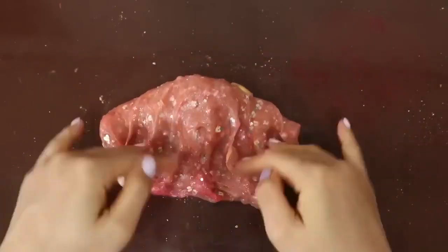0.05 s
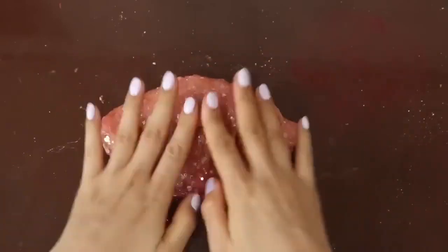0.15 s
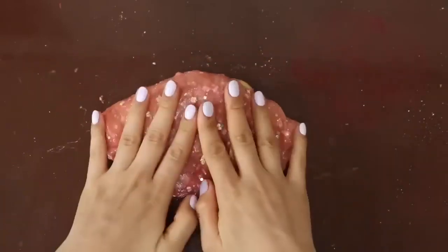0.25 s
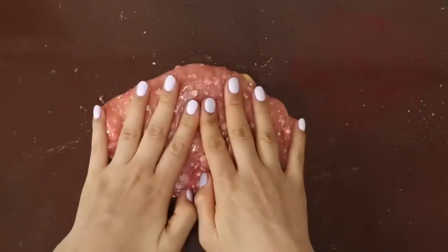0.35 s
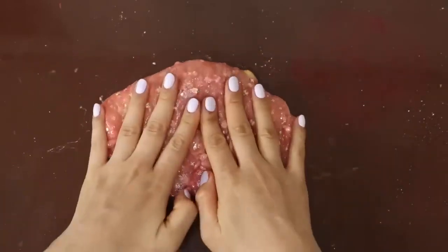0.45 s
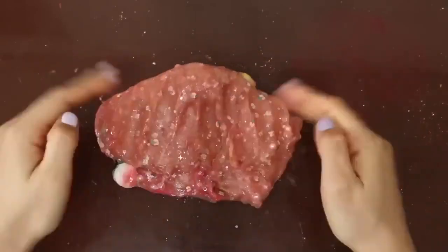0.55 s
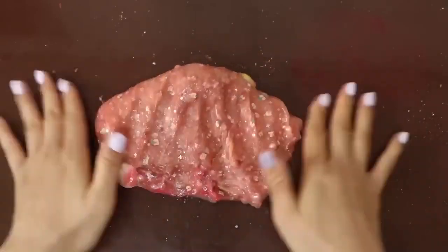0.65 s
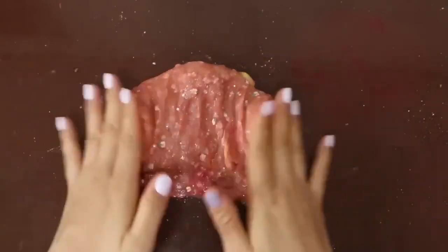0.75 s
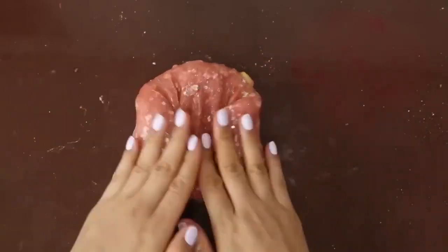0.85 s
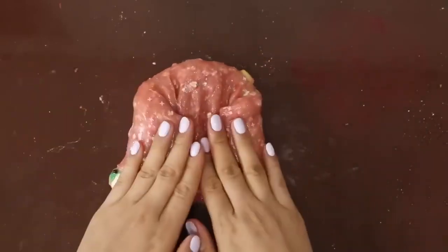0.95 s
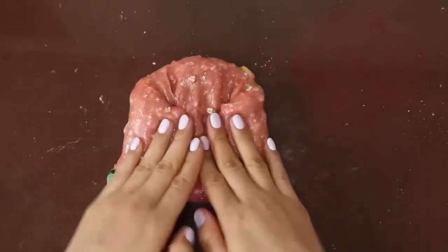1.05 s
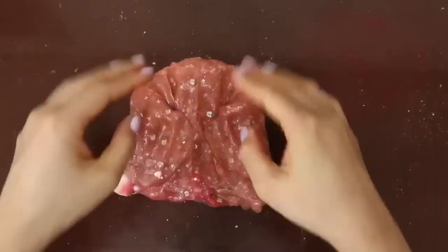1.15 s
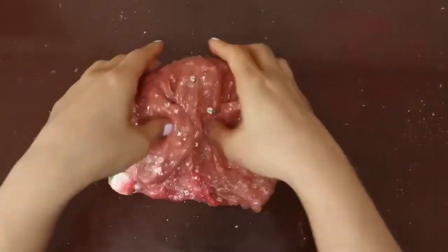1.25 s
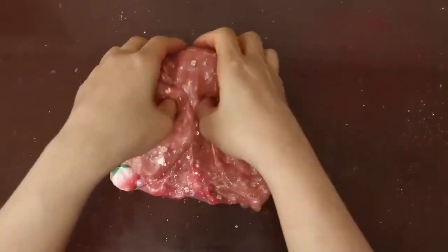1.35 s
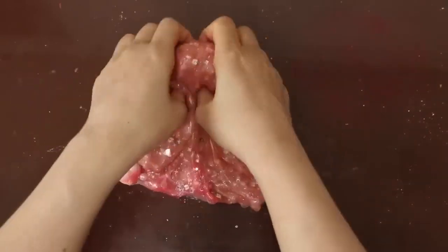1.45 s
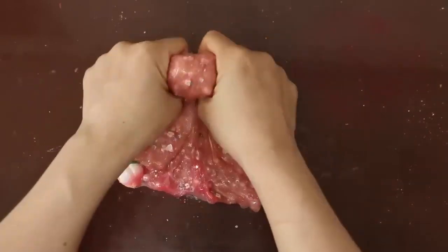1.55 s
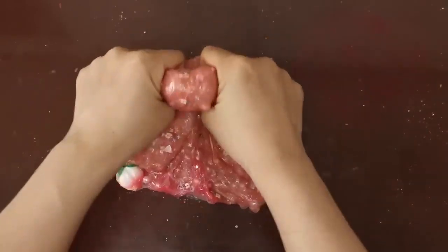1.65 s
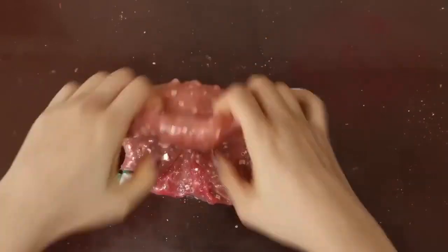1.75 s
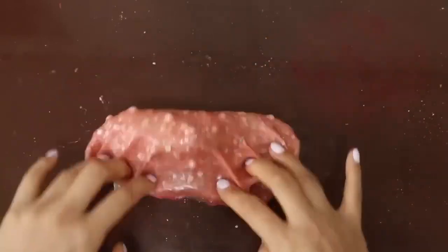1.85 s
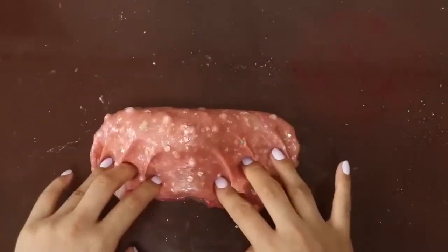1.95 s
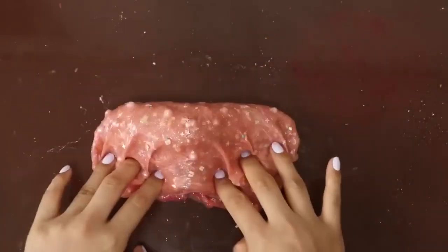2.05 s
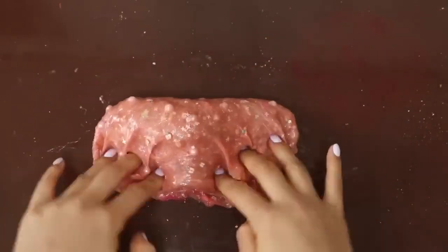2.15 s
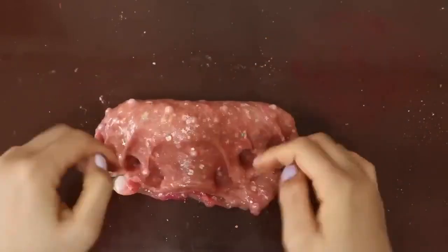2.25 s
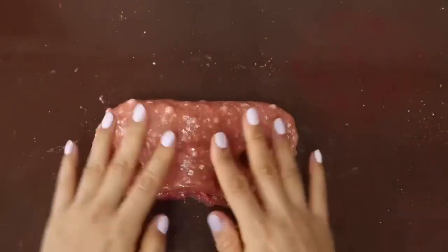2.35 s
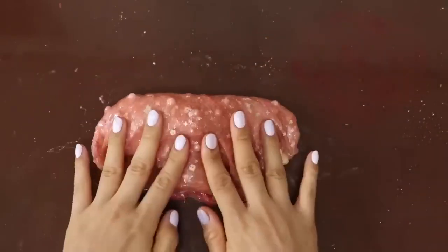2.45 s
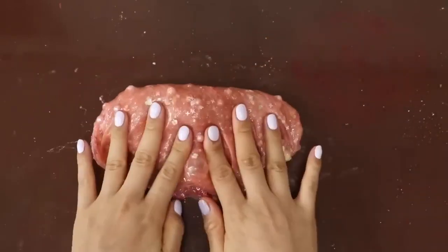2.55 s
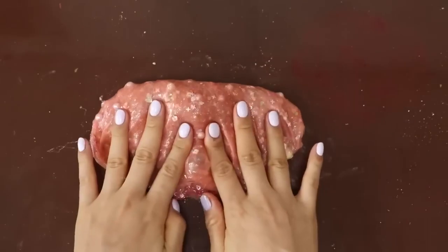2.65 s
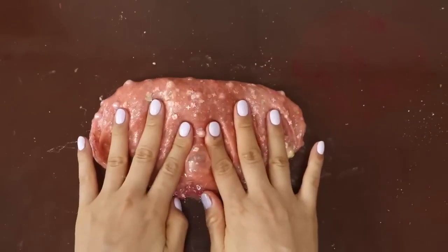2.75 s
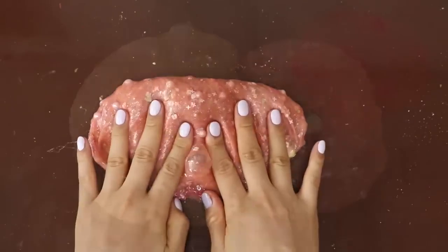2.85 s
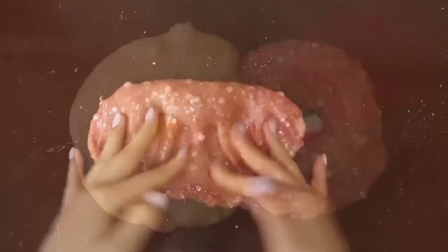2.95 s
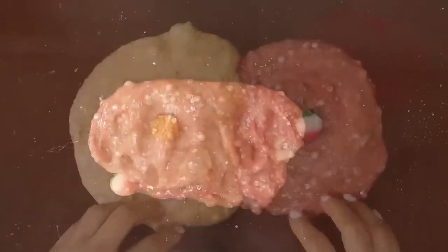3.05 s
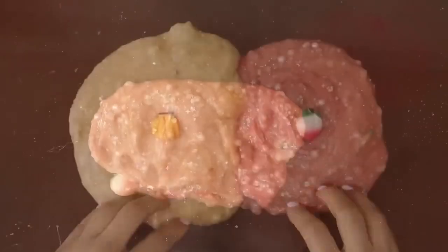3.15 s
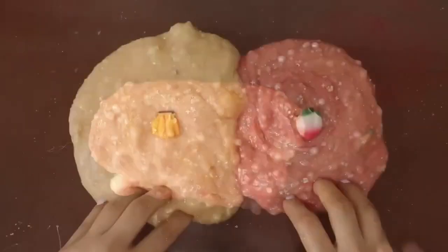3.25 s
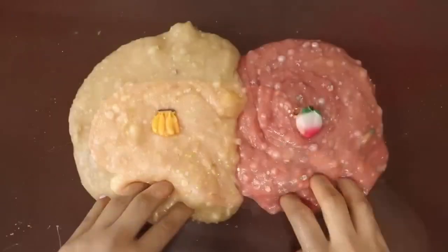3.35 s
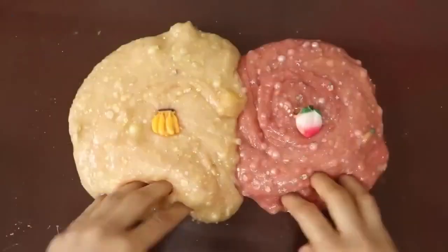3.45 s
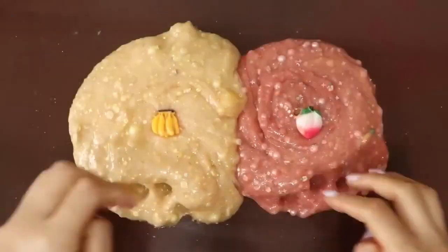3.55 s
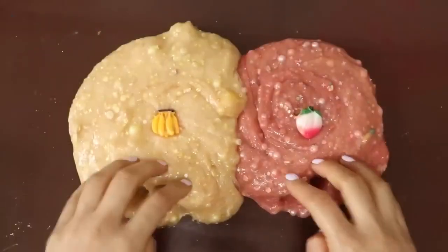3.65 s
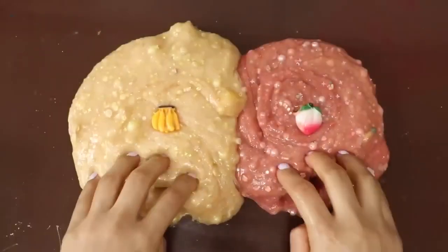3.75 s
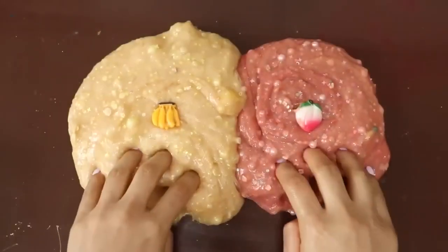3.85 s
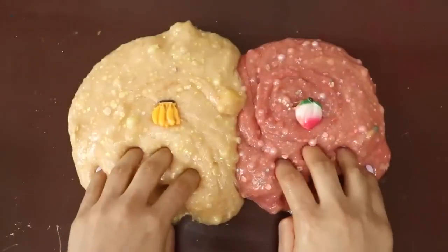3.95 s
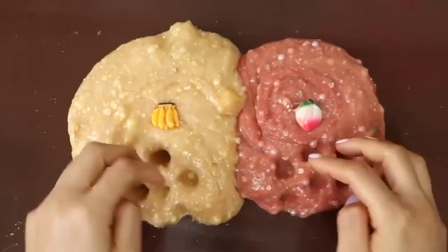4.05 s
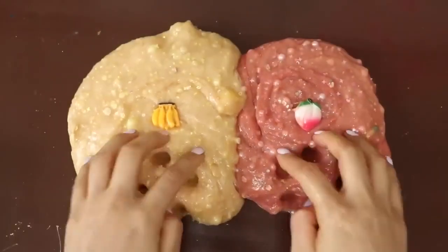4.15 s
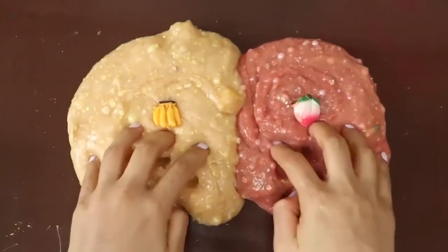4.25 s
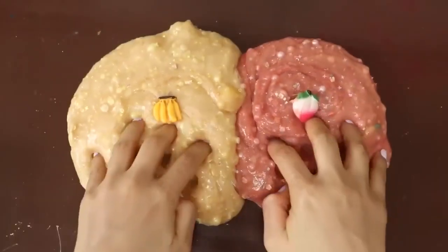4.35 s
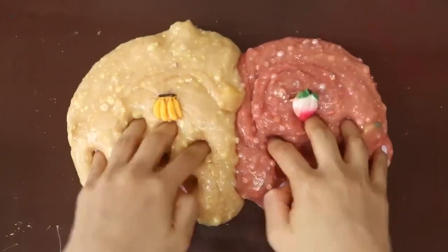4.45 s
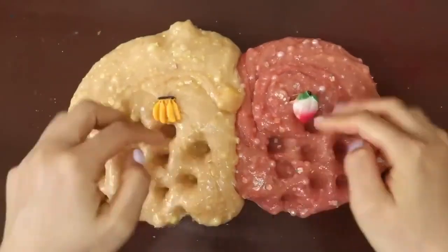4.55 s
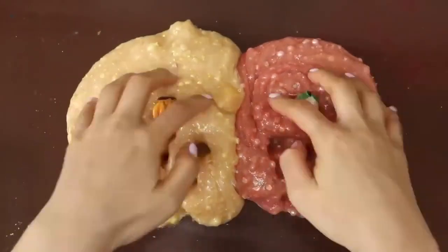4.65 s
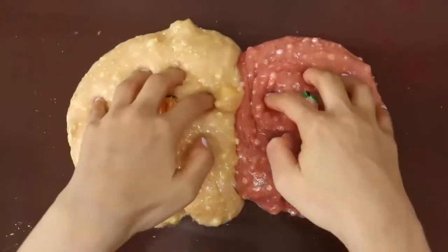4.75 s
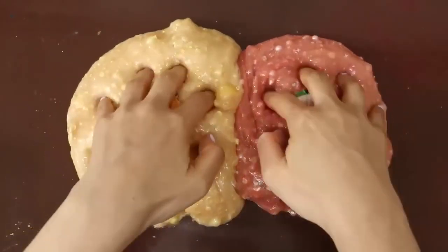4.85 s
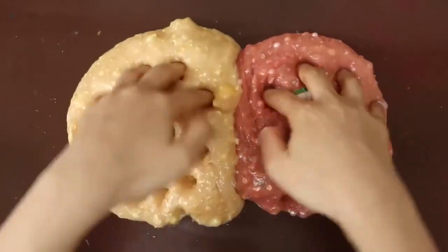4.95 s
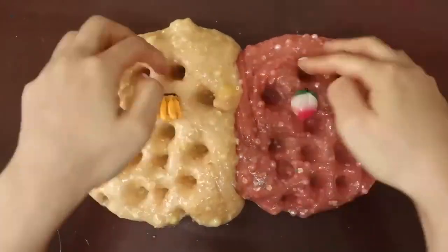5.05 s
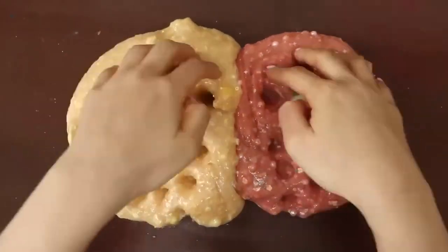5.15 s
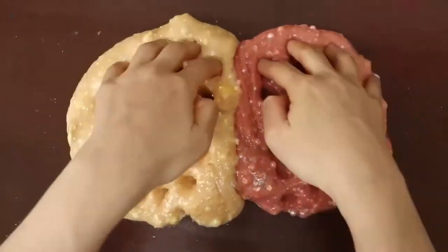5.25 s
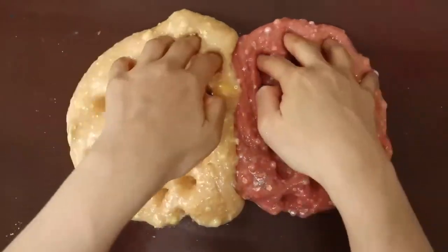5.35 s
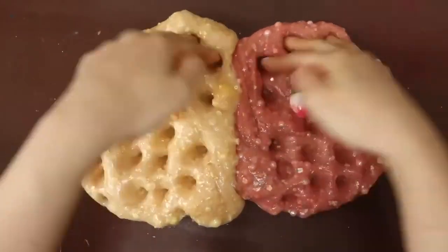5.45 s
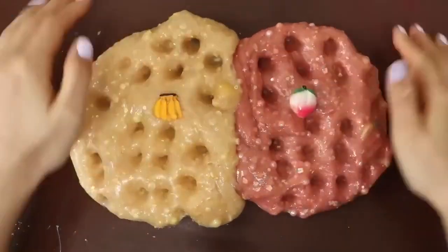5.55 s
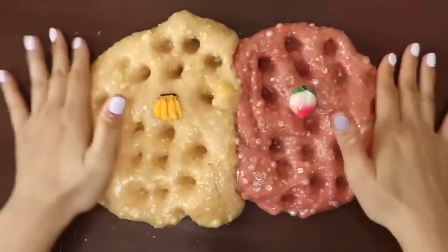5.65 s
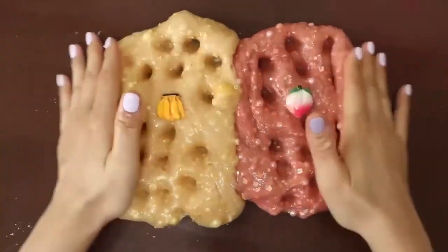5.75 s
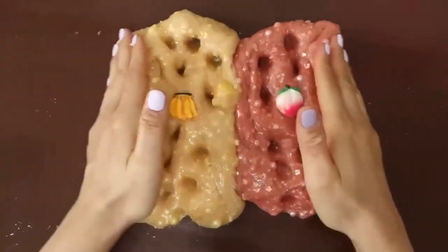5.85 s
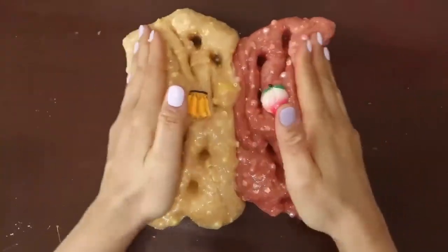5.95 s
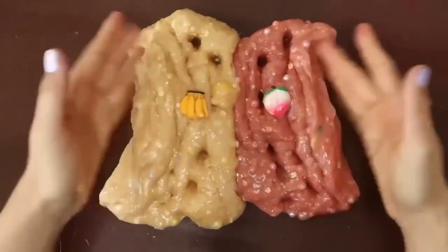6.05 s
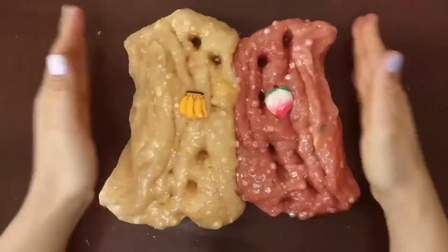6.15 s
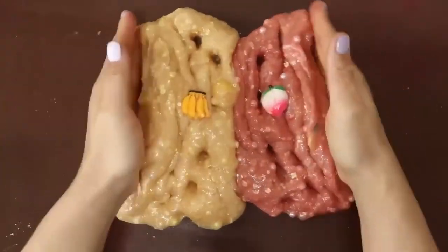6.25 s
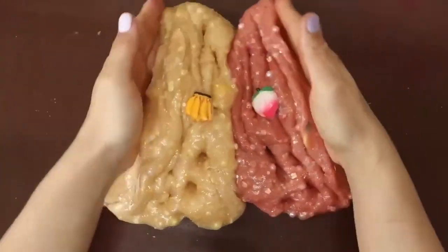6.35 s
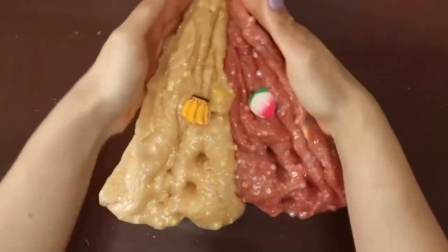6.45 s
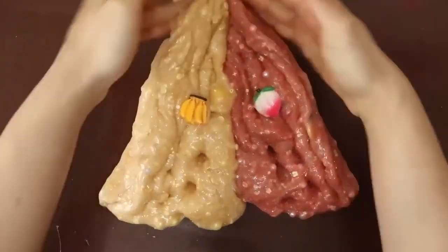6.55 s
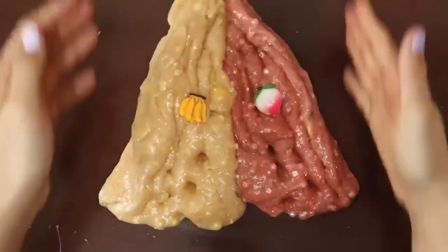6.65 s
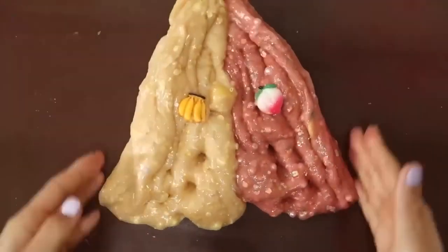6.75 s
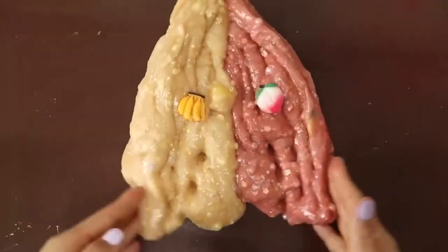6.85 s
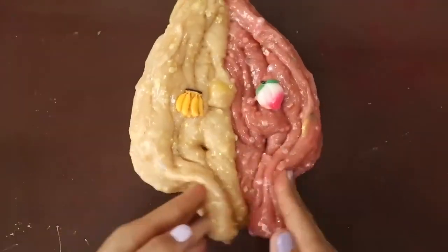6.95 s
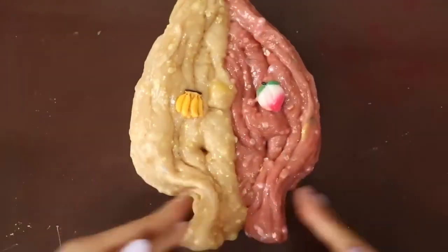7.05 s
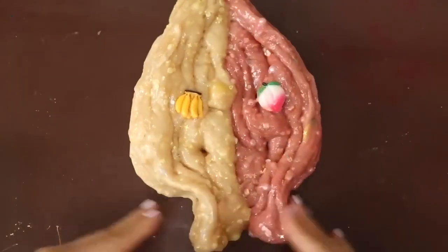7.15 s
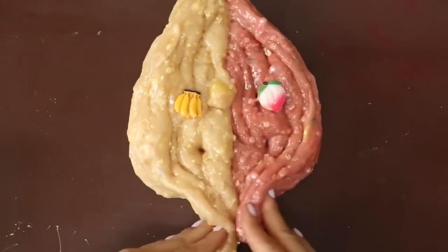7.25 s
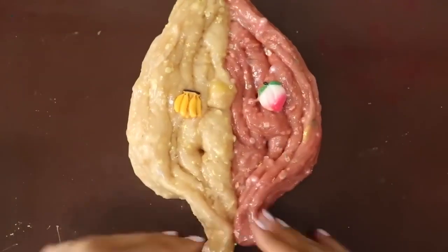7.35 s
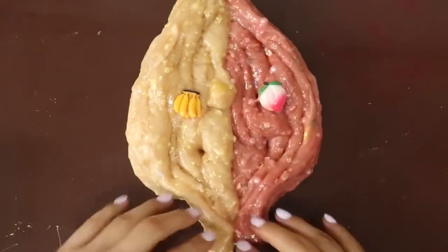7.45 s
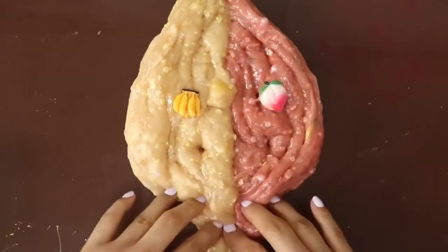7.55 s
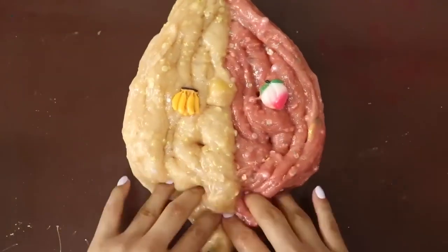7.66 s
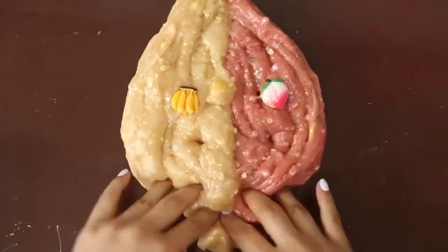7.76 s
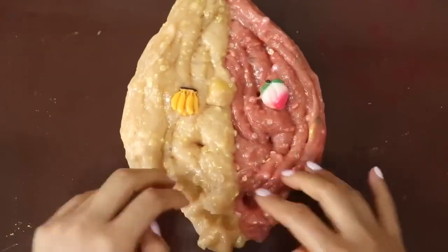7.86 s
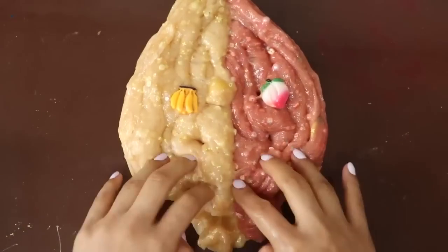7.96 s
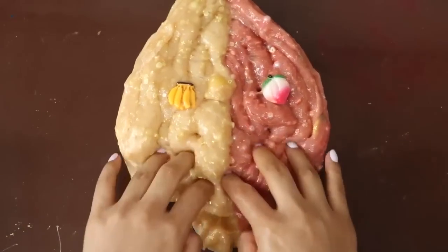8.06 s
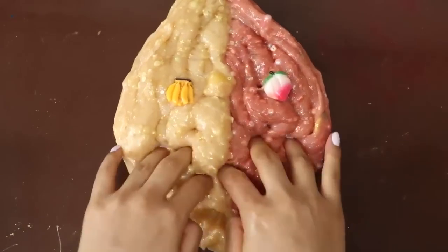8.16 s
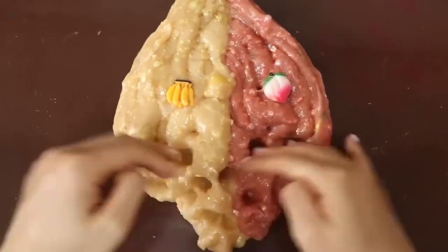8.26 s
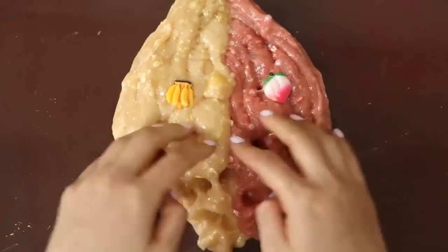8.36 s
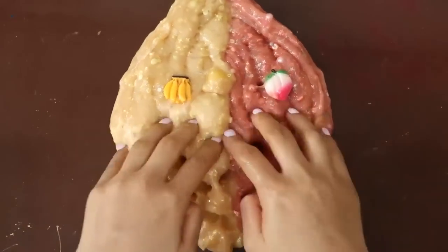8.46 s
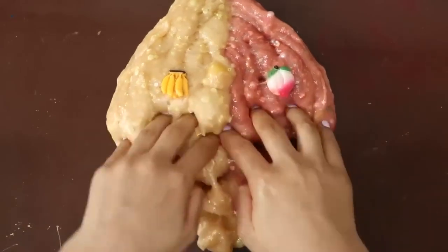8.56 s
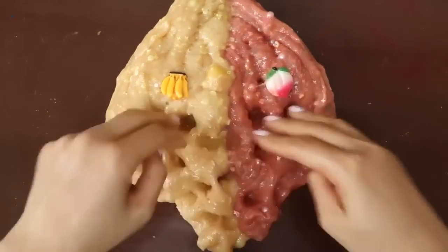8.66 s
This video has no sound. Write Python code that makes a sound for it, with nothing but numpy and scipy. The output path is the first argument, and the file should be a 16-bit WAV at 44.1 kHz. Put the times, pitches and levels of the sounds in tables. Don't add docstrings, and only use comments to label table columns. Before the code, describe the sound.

In a quiet, slightly reflective room, a very close microphone pair catches fingers squeezing tacky slime. Wet film tears in dense tiny crackles, trapped air bursts with crisp hollow pops, and thin strands tick apart. Soft at first, it grows loudest midway as fingers poke repeatedly, then thins to scattered ticks, one flat slap and gentle presses. Low thuds shake the table under faint hiss and hum.

```python
import sys
import numpy as np
from scipy import signal
from scipy.io import wavfile
from scipy.ndimage import uniform_filter1d

SR = 44100
rng = np.random.default_rng(int(sys.argv[2]) if len(sys.argv) > 2 else 0)


def master_out(mix):
    frames = np.transpose(np.atleast_2d(mix))
    ceiling = np.clip(frames, -1, 1)
    pcm = np.round(ceiling * 32767).astype(np.int16)
    wavfile.write(sys.argv[1], SR, pcm)


def magnitude_from_level(level_db):
    exponent = np.asarray(level_db, float) / 20
    return 10 ** exponent


N = 384552


def rms_one(x):
    return x / np.sqrt(np.mean(x ** 2) + 1e-20)


def at_hz(points, hz):
    points = np.array(points)
    return np.interp(np.log(hz), np.log(points[:, 0]), points[:, 1])


def drift(rate_hz):
    r = np.exp(-2 * np.pi * rate_hz * 40 / SR)
    white = rng.standard_normal(N // 40 + 2002)
    slow = signal.lfilter([1], [1, -2 * r, r * r], white)[2000:]
    return np.interp(np.arange(N) / 40, np.arange(len(slow)), rms_one(slow))


def resonate(x, hz, width_hz):
    r = np.exp(-np.pi * width_hz / SR)
    poles = [1, -2 * r * np.cos(2 * np.pi * hz / SR), r * r]
    return signal.lfilter(np.array([1, 0, -1]) * (1 - r * r) / 2, poles, x)


def spread(mid, side, alike):
    alike = np.clip(alike, -1, 1)
    return np.sqrt((1 + alike) / 2) * mid + np.sqrt((1 - alike) / 2) * side * [[1], [-1]]


# (pitch [Hz], level [dB per Hz])
ROOM_HISS = [(20, -8), (48, -3), (91, -11.5), (143, -9), (273, -30.5), (1110, -34), (4000, -48.5),
             (16500, -48)]
# (pitch [Hz], likeness [-1 to 1])
ROOM_LIKENESS = [(60, 0.32), (380, 0.92), (2380, 0.9), (15000, 0.18)]


def room_tone():
    hiss_db, hum_db, hum_hz = -53, -72.5, 346
    hiss, edges_hz = 0, 20 * 2 ** np.arange(0, 10.1, .5)
    white = rng.standard_normal((2, 2, N))
    for k, (low, high) in enumerate(zip(edges_hz, edges_hz[1:])):
        band = signal.butter(2, [low, high], "band", fs=SR, output="sos")
        mid, side = signal.sosfilt(band, white[k % 2])
        hz = np.sqrt(low * high)
        hiss = hiss + magnitude_from_level(at_hz(ROOM_HISS, hz)) * spread(mid, side, at_hz(ROOM_LIKENESS, hz))
    hum = resonate(white[0, 0], hum_hz, 3.3) + .5 * resonate(white[1, 0], 1.5 * hum_hz, 8.2)
    return magnitude_from_level(hiss_db) * rms_one(hiss) + magnitude_from_level(hum_db) * rms_one(hum)


def echoes(x):
    t60_s, wall_cut_hz = 0.18, 8700
    t = np.arange(9000) / SR
    tail = rng.standard_normal((2, len(t))) * magnitude_from_level(-60 * t / t60_s) * (t > .002)
    dull = np.exp(-2 * np.pi * wall_cut_hz / SR)
    tail = signal.lfilter([1 - dull], [1, -dull], tail)
    tail = tail / np.sqrt(np.sum(tail ** 2) / 2)
    return signal.fftconvolve(x, tail, axes=1)[:, :N]


# (time of the peak [s], level [dB])
SHOVES = [(0.188, -32.5), (0.315, -29), (0.618, -31), (0.779, -29.5), (0.921, -45), (1.33, -35.5),
          (1.841, -22), (2.341, -29.5), (2.521, -48), (3.072, -30), (3.582, -31.5), (4.149, -22.5),
          (4.266, -38.5), (4.652, -21), (4.781, -35), (5.129, -19.5), (5.589, -22), (5.747, -25),
          (6.22, -21.5), (6.698, -21), (7.207, -29.5), (7.362, -34), (7.476, -28.5), (7.936, -22),
          (8.031, -31.5), (8.34, -22)]


def stand():
    sway_hz, jolt_hz = 30.5, 62.4
    t, out = np.arange(22050) / SR, np.zeros((2, N + 22050))
    swell = t / 0.036 * np.exp(1 - t / .035)
    sway_level = (1 - np.exp(-t / 0.011)) * np.exp(-t / 0.096)
    for (s, db), (detune, turn, skew) in zip(SHOVES, rng.standard_normal((len(SHOVES), 3))):
        phase = 3 * turn + np.array([[0], [1.1 + .4 * skew]])
        sway = sway_level * np.sin(2 * np.pi * sway_hz * (1 + 0.07 * detune) * t + phase)
        jolt = 0.42 * swell ** 2 * np.sin(2 * np.pi * jolt_hz * (1 + 0.19 * skew) * t + phase)
        at = round((s - .04) * SR)
        out[:, at:at + len(t)] += magnitude_from_level(db - 1.0) * (sway + jolt) * magnitude_from_level([[1.5], [-1.5]])
    return out[:, :N]


# (time of the peak [s], rocking level [dB], boom level [dB], boom pitch [Hz])
KNOCKS = [(0.167, -42, -49, 147.6), (0.308, -31, -39.5, 70), (0.617, -38, -46.5, 285),
          (0.773, -37, -38, 181.5), (1.839, -46, -38.5, 115), (2.323, -35, -37.5, 129),
          (3.054, -32, -39.5, 263), (3.601, -34, -35, 199), (4.123, -24, -32.5, 198),
          (4.625, -28, -27.5, 192), (5.119, -27.5, -29.5, 241.7), (5.371, -48, -50.5, 264),
          (5.577, -30, -32.5, 238), (5.721, -33.5, -34, 189.5), (6.181, -37, -36.5, 140),
          (6.334, -42, -49, 129), (6.675, -42, -48.5, 248), (7.052, -41, -48, 132.7),
          (7.163, -44, -47.5, 145.3), (7.345, -38, -40, 195), (7.446, -46, -44, 222),
          (7.9, -29.5, -35.5, 254.2), (8.027, -45, -53.5, 197.7), (8.344, -24.5, -27.5, 187)]


def table():
    rock_hz = 124.6
    t, out = np.arange(22050) / SR, np.zeros((2, N + 22050))
    swell = (t / 0.02 * np.exp(1 - t / 0.023)) ** 1.9
    whites = rng.standard_normal((len(KNOCKS), 3, len(t)))
    for (s, rock_db, boom_db, boom_hz), white in zip(KNOCKS, whites):
        rock = resonate(swell * (np.sin(2 * np.pi * rock_hz * t) + 5 * white[0]), rock_hz, 34)
        boom = resonate(swell * np.sin(2 * np.pi * boom_hz * t), boom_hz, 72)
        rattle = resonate(resonate(swell * white[1:], 210, 140), 210, 140)
        knock = magnitude_from_level(boom_db + 2.0) * (0.66 * boom + 7.76 * rattle)
        knock = knock + magnitude_from_level(rock_db + 3.0) * rock * [[.85], [-1.15]]
        at = round((s - .035) * SR)
        out[:, at:at + len(t)] += knock
    rumble = resonate(resonate(rng.standard_normal((2, N)), 110, 170), 110, 170)
    restless = magnitude_from_level(3.2 * drift(6)) * rms_one(rumble)
    return out[:, :N] + magnitude_from_level(-57.0) * restless


# (time [s], level [dB])
SLIDE = [(0.0, -73), (1.38, -65.5), (1.7, -52), (2.01, -68.5), (3.6, -76), (3.82, -60), (4.1, -67),
         (6.63, -62), (7.48, -67), (7.72, -56.5), (7.95, -64), (8.72, -71)]


def sliding():
    rustle_hz, rustle_width_hz, rustle_db = 2800, 1500, -5
    stray_per_s, stray_db = 35, 10
    rustle = rms_one(resonate(rng.standard_normal((2, N)), rustle_hz, rustle_width_hz))
    born = rng.random(N) < stray_per_s * magnitude_from_level(6 * drift(3)) / SR
    sizes = born * rng.standard_normal(N)
    girth = rng.integers(0, 3, N)
    stray = 0
    for k, hz in enumerate((2500, 5000, 10000)):
        chosen = sizes * (girth == k) * [[1], [.8]] + 1e-18
        stray = stray + resonate(chosen, hz, 0.7 * hz) * 5000 / hz
    times, levels_db = np.transpose(SLIDE)
    level_db = np.interp(np.arange(N) / SR, times, levels_db)
    return magnitude_from_level(level_db) * (magnitude_from_level(rustle_db + 3.1 * drift(11.0)) * rustle + magnitude_from_level(stray_db) * stray)


# (time [s], level [dB], pitch [Hz],
# length [s])
HOLES = [(0.891, -50.5, 1205, 0.01), (3.049, -38, 2000, 0.021), (3.059, -36, 3730, 0.011),
         (3.603, -23.5, 820, 0.004), (3.625, -45.5, 830, 0.024), (0.13, -50.5, 600, 0.03),
         (0.615, -46.5, 720, 0.026), (1.6, -53.5, 328, 0.05), (1.949, -50, 3440, 0.013),
         (3.038, -43.5, 3700, 0.019), (3.615, -42, 1410, 0.016), (5.105, -23.5, 3000, 0.012),
         (6.9, -53, 240, 0.064), (7.89, -33, 600, 0.006), (7.896, -40.5, 1205, 0.006),
         (8.326, -29, 1100, 0.012), (8.714, -45, 484, 0.008), (4.131, -31, 3400, 0.016),
         (8.347, -38.5, 4000, 0.013), (4.604, -29, 900, 0.003), (4.617, -30, 380, 0.0071),
         (6.787, -44, 258, 0.011), (6.84, -47.5, 228, 0.013), (5.26, -60.5, 900, 0.0083)]


def holes():
    slap_s, slap_db = 6.568, -11.5
    t, out = np.arange(N) / SR, np.zeros((2, N))
    mid, side = rng.standard_normal((2, N))
    patchy = rms_one(uniform_filter1d(side, size=130))
    for s, db, hz, length in HOLES:
        near = slice(round((s - .1) * SR), round((s + .1) * SR))
        puff = rms_one(resonate(spread(mid[near], side[near], 0.81), hz, 0.15 * hz))
        puff = puff * magnitude_from_level(2.7 * patchy[near])
        out[:, near] += magnitude_from_level(db) * puff * np.exp(-((t[near] - s) / length) ** 2)
    return out - magnitude_from_level(slap_db) * np.exp(-((t - slap_s) / 0.00024) ** 2)


# (time [s], peak level [dB], pitch [Hz])
BRIGHT_TICKS = [(0.0677, -48, 8940), (0.6826, -48, 10720), (0.8132, -31, 9090), (0.8194, -25, 9350),
                (0.9686, -53, 7440), (0.9922, -48, 9270), (1.169, -42, 10000), (1.1844, -38, 9830),
                (1.514, -31, 10240), (1.5178, -35, 6700), (1.5609, -29, 11330), (1.6238, -31, 7600),
                (1.7654, -40, 9960), (1.8175, -27, 9700), (1.8843, -29, 6700), (1.959, -39, 8220),
                (2.891, -58, 6940), (4.2515, -55, 7410), (4.3584, -59, 7050), (4.3732, -47, 8400),
                (4.4078, -56, 13050), (4.4618, -54, 10600), (4.8102, -53, 8930), (4.834, -54, 11900),
                (4.8696, -50, 9000), (4.9941, -54, 8010), (4.9987, -51, 6700), (5.2806, -52, 13000),
                (5.3144, -41.5, 10870), (5.41, -54, 7240), (5.4571, -52, 8800), (5.6937, -43, 9500),
                (5.7329, -45, 7100), (5.8214, -30, 10600), (5.8382, -37, 9480), (5.9975, -33, 6900),
                (6.0034, -39, 10980), (6.0314, -35, 9660), (6.0374, -37, 6130), (6.3152, -44, 12100),
                (6.365, -35, 12580), (6.3683, -35, 8400), (6.4076, -29, 12000), (6.4719, -43, 8360),
                (6.4828, -30, 13640), (6.5097, -29, 11560), (6.5479, -28, 11940), (6.9443, -32, 11400),
                (7.0359, -39.5, 10260), (7.3566, -46, 8550), (7.3929, -50.5, 8320), (7.8428, -49.5, 6520),
                (7.8619, -41, 7870), (8.1411, -42.5, 12170), (8.2444, -53, 6910), (8.6482, -53, 11480),
                (8.6528, -54, 10540), (8.7108, -29.5, 6390)]
# (time [s], peak level [dB], pitch [Hz])
DULL_TICKS = [(0.4445, -43, 3070), (0.491, -53, 4150), (0.6641, -52, 3230), (0.9252, -53, 4410),
              (1.0086, -48, 5430), (1.2003, -31.5, 2790), (1.2497, -53, 3410), (1.3781, -46, 2340),
              (1.3851, -41, 3400), (1.4845, -35, 3920), (1.4948, -33, 5110), (1.5038, -43, 4340),
              (1.5072, -40, 4460), (1.579, -37, 4270), (1.5912, -37, 3090), (1.5944, -38, 4590),
              (1.9365, -42, 5790), (2.0022, -54.5, 2560), (2.0614, -47.5, 1860), (2.1591, -49, 3770),
              (2.2212, -56, 3220), (2.523, -58.5, 1700), (2.5301, -52, 1370), (2.5755, -57.5, 4600),
              (2.8787, -53.5, 3570), (3.3394, -53, 3240), (3.3493, -56, 2600), (3.472, -50.5, 5230),
              (3.5669, -38, 1400), (3.583, -14, 4700), (3.9226, -45.5, 3610), (4.0057, -53, 2200),
              (4.0235, -57, 4380), (4.1319, -16, 3360), (4.7966, -52, 5660), (4.9102, -49, 5400),
              (4.927, -49, 3720), (5.2543, -55, 2800), (5.2669, -57.5, 4060), (5.4234, -45, 2740),
              (5.4638, -48.5, 4260), (5.7086, -48, 4560), (5.8694, -30.5, 3230), (6.0512, -40, 1550),
              (6.3332, -41.5, 5400), (6.5414, -42, 5180), (6.7173, -44, 3300), (6.7329, -52, 3210),
              (7.1354, -38.5, 1610), (7.3107, -60, 4420), (7.6075, -51, 5910), (7.6764, -57, 3170),
              (7.7101, -47.5, 4130), (7.8652, -37.5, 5820), (7.9011, -22.5, 4120), (8.0636, -54.5, 2280),
              (8.1239, -57, 5630), (8.3266, -20, 3440)]
# (time [s],
# peak level [dB], pitch [Hz])
MIXED_TICKS = [(5.054, -34, 9000), (5.0805, -12, 3600), (5.0802, -8, 12000), (5.0822, -8.5, 12500),
               (5.1058, -12, 5000), (5.1082, -10, 12500), (5.118, -16, 2800), (4.5915, -24, 6000),
               (4.602, -14, 5000), (4.614, -21, 7000), (1.6446, -5, 4000), (8.3135, -16, 3560),
               (8.3122, -8.5, 12300), (4.6032, -13, 3170), (5.761, -41, 6100), (6.0787, -30, 13300),
               (4.586, -32, 2500), (3.572, -32, 4200), (5.794, -41.5, 2200), (5.878, -34, 4200)]


def ticks():
    rip_s, width, raw, gain_db, pan_scatter_db = 0.00023, 0.17, 0.14, 4, 1.5
    t, rows = np.arange(300) / SR, list(BRIGHT_TICKS) + list(DULL_TICKS) + list(MIXED_TICKS)
    out = np.zeros((2, N + len(t)))
    dying = np.exp(-t / rip_s) + 0.1 * np.exp(-t / 0.002)
    for (s, db, hz), (mid, side) in zip(rows, rng.standard_normal((len(rows), 2, len(t)))):
        rip = spread(np.r_[-2, mid[1:]], side, 0.57) * dying
        tick = resonate(raw * rip + resonate(rip, hz, width * hz), hz, 2.5 * hz)
        tick = tick / np.abs(tick.mean(axis=0)).max()
        pan_db = pan_scatter_db * np.clip(side[-1], -2, 2) * np.array([[.5], [-.5]])
        at = round(s * SR)
        out[:, at:at + len(t)] += magnitude_from_level(db + gain_db + pan_db) * tick
    return out[:, :N]


def grains(per_s, pitches_hz, cycles, uneven_db, tilt_db, alike):
    born = rng.random((2, N)) < per_s * magnitude_from_level(2.6 * drift(60)) / SR
    luck_db = uneven_db * np.minimum(rng.exponential(1, (2, N)), 3.5)
    sizes = born * magnitude_from_level(luck_db) * rng.choice([-1, 1], (2, N))
    dealt = rng.integers(0, len(pitches_hz), (2, N))
    ringing = 0
    for k, hz in enumerate(pitches_hz):
        ring = resonate(sizes * (dealt == k) + 1e-18, hz, hz / cycles)
        ringing = ringing + ring * magnitude_from_level(tilt_db * np.log2(hz) + 4.2 * drift(5.1))
    mid, side = ringing
    return rms_one(spread(mid, side, alike))


def snaps():
    per_s, gain_db = 90, 17
    born = (rng.random(N) < per_s / SR) * rng.standard_normal((2, N))
    return magnitude_from_level(gain_db) * signal.lfilter([1, -1], [1, -.7], spread(*born, .8))


# (time of the peak [s], fizz level [dB], squelch level [dB], swell [ms per 20 dB], fade [ms per 20 dB])
PRESSES = [(0.12, -39.5, -40, 47, 55), (0.623, -34.5, -36.5, 65, 33), (1.197, -42, -34, 30, 51),
           (1.65, -30.5, -35.5, 24, 49.5), (1.832, -29, -30, 76, 57), (2.312, -36, -30.5, 37.5, 29.5),
           (3.049, -35.5, -27.5, 30.5, 39), (3.604, -37.5, -33, 27, 49), (4.11, -49, -19.5, 17, 56),
           (4.133, -25.5, -28.5, 14, 35), (4.598, -22.5, -17, 12, 45), (5.083, -24, -14.5, 8.5, 45.5),
           (5.109, -17.5, -11, 22, 20), (5.547, -22, -26, 16.5, 38.5), (5.573, -22.5, -39, 26, 14),
           (6.166, -33, -31.5, 61, 29), (6.671, -29, -34, 62, 19), (7.14, -47, -39.5, 24.5, 41),
           (7.436, -49, -40.5, 26, 34), (7.898, -34.5, -29.5, 22.5, 36), (8.318, -32, -26, 8, 52),
           (8.35, -38, -34, 29, 42), (8.718, -34.5, -39, 17.5, 24)]
# (time [s], fizz level [dB], squelch level [dB])
PEELS = [(0.279, -47.5, -47), (0.368, -40, -54), (0.523, -45, -63), (0.755, -47.5, -55), (1.439, -47, -65),
         (1.715, -43, -46), (2.708, -50.5, -66), (3.557, -44, -35.5), (3.575, -44, -39.5),
         (4.09, -39.5, -45.5), (5.058, -30, -27), (6.777, -67, -46), (6.836, -51, -50), (7.33, -52.5, -46)]
# (time of the peak [s], fizz level [dB], swell [ms per 20 dB], fade [ms per 20 dB])
STRETCHES = [(0.817, -42.5, 49, 133), (1.513, -48.5, 188, 88), (1.561, -46.5, 66.5, 183.5),
             (1.946, -48.5, 206, 61), (3.176, -54, 169, 29.5), (5.73, -53.5, 42, 127),
             (5.876, -43, 146.5, 67), (6.005, -51, 246.5, 247), (6.378, -43, 61, 253),
             (6.572, -41, 216, 40), (6.989, -45.5, 218, 137)]


def squishes():
    peel_swell_ms, peel_fade_ms, stretch_squelch_db = 4, 49, -2
    crackle_leans, crackle_db = 0.21, -4
    rows = list(PRESSES)
    rows += [(*row, peel_swell_ms, peel_fade_ms) for row in PEELS]
    rows += [(s, db, db + stretch_squelch_db, swell, fade) for s, db, swell, fade in STRETCHES]
    return [(s, fizz, fizz + crackle_leans * (squelch - fizz) + crackle_db, squelch, swell, fade)
            for s, fizz, squelch, swell, fade in rows]


def tearing():
    t = np.arange(0, N, 32) / SR
    power = np.zeros((3, len(t)))
    for s, *level_db, swell_ms, fade_ms in squishes():
        away = 1000 * np.where(t < s, (s - t) / swell_ms, (t - s) / fade_ms)
        power += magnitude_from_level(np.array(level_db)[:, None] - 20 * away ** 1.03) ** 2
    fizz, crackle, squelch = [np.interp(np.arange(N) / SR, t, np.sqrt(p)) for p in power]
    fine = grains(8300, np.geomspace(5000, 13000, num=6), 4.6, 5.0, tilt_db=2.5, alike=0.33)
    medium = grains(2700, np.geomspace(2500, 5600, num=6), 7.1, 5.0, tilt_db=-0.7, alike=0.93)
    coarse = grains(2600, np.geomspace(520, 2300, num=8), 2.1, 4.0, tilt_db=-5.0, alike=0.38)
    out = crackle * snaps() + magnitude_from_level(-2.5) * fizz * fine
    return out + magnitude_from_level(-3.0) * crackle * medium + magnitude_from_level(-4.5) * squelch * coarse


# (time [s], snap peak level [dB], hollow peak level [dB], hollow pitch [Hz])
THIN_POCKETS = [(0.3737, -21, -39.5, 690), (1.432, -17.5, -35, 750), (1.651, -2, -24, 1190),
                (1.7113, -13.5, -32, 2220), (1.7228, -32, -28.5, 2140), (1.7941, -18, -29, 570),
                (1.8032, -12, -49, 601), (3.5814, -15.5, -36.5, 1813), (3.5995, -24, -16, 1550),
                (4.086, -5.5, -17, 1070), (4.1065, -9, -14.5, 600), (4.1156, -19, -16, 1375),
                (4.5786, -24, -30, 550), (5.058, 1.5, -7, 937), (5.079, -6, -15, 960),
                (5.0812, -5.5, -5.5, 810), (5.0848, -22.5, -20, 795), (5.105, -7.5, -25, 866),
                (5.1062, -9.5, -5, 1360), (5.5328, 1.5, 1.5, 1500), (5.5324, -13.5, -25, 1450),
                (5.547, -4.5, -8, 1240), (5.5717, -9.5, -18, 1320), (6.1602, -26.5, -38, 814),
                (6.3767, -6, -22, 1350), (6.5261, -13.5, -26, 2130), (6.6462, -21, -39, 1000),
                (8.3119, -15.5, -13, 1370), (8.3274, -20, -14.5, 498)]
# (time [s], snap peak level [dB], hollow peak level [dB], hollow pitch [Hz], left over right [dB])
THICK_POCKETS = [(1.5527, -26.5, -38, 1340, 3), (1.5665, -18, -29.5, 1431, 5.5),
                 (1.6443, -7, -38, 2100, -4), (1.7017, -30, -46, 2190, 3), (1.7386, -22, -35, 1360, -1),
                 (3.0464, -36, -21.5, 654, 4), (3.5836, -22, -17.5, 1710, 8), (3.599, -30, -18, 850, 9),
                 (4.135, -9.5, -19, 1330, 4), (4.597, -10.5, -17, 1390, 0), (4.6005, -17.5, -14.5, 2050, 1),
                 (4.6287, -19, -24.5, 790, 9), (5.1094, -4, -4, 1073, 10), (5.545, -20.5, -10.5, 1500, 5),
                 (6.0788, -27.5, -39, 1520, 0), (6.5673, -13.5, -13.5, 2400, 1), (6.58, -28, -37, 950, -1),
                 (6.6667, -30, -30.5, 890, 0), (6.7747, -29, -36.5, 1590, 14),
                 (6.7798, -27.5, -31, 2530, 2), (6.8324, -22.5, -38, 1840, -1.5), (8.313, -14, -15, 786, 6)]
# (time [s], snap peak level [dB])
FINE_THREADS = [(0.033, -41), (0.301, -29), (0.5183, -25.5), (0.8064, -29), (3.2095, -50), (0.8385, -29),
                (0.9054, -39), (1.0322, -34), (1.4006, -35), (1.617, -18), (1.67, -18), (1.676, -20.5),
                (3.489, -35), (3.752, -46), (3.9822, -41), (4.3681, -44), (4.8726, -41.5), (4.942, -36.5),
                (5.359, -35.5), (5.789, -37), (5.83, -20), (5.966, -33), (6.488, -22), (6.5545, -20),
                (6.675, -17), (6.8952, -29), (7.755, -43), (7.318, -39), (8.1688, -40), (8.611, -35)]
# (time [s], snap peak level [dB], snap pitch [Hz])
COARSE_THREADS = [(0.3631, -27.5, 4580), (0.4407, -34, 5800), (0.4793, -42, 3900), (0.752, -39, 7850),
                  (0.7964, -36, 5450), (1.4105, -36, 2320), (3.349, -52, 1500), (1.5368, -37, 3300),
                  (1.6104, -28, 3450), (1.631, -33, 5700), (1.664, -18, 4370), (2.1681, -46.5, 3380),
                  (2.2432, -39.5, 3630), (2.7066, -31.5, 7700), (2.824, -43.5, 8300), (3.896, -45, 4140),
                  (4.397, -46, 3260), (5.3327, -37, 2880), (5.7252, -41, 5060), (6.02, -39.5, 6660),
                  (6.1835, -24.5, 7300), (6.3086, -29.5, 5040), (6.3683, -42.5, 7700),
                  (6.4636, -29.5, 5020), (7.3293, -31.5, 3460), (7.6403, -41.5, 2746), (7.696, -45.5, 5400),
                  (7.8856, -27.5, 6200), (8.0512, -39, 6230), (8.1996, -39.5, 3320)]


def bursts():
    thin_snap_hz, thick_snap_hz, fine_snap_hz = 11300, 3440, 11700
    thread_hollow_db, thread_hollow_hz = -19, 1610
    snap_scatter, pan_scatter_db = 0.021, 1.5
    threads = [(*row, fine_snap_hz) for row in FINE_THREADS] + list(COARSE_THREADS)
    rows = [(s, db, thin_snap_hz, *hollow, None) for s, db, *hollow in THIN_POCKETS]
    rows += [(s, db, thick_snap_hz, *rest) for s, db, *rest in THICK_POCKETS]
    rows += [(s, db, hz, db + thread_hollow_db, thread_hollow_hz, None) for s, db, hz in threads]
    luck = np.clip(rng.standard_normal((len(rows), 2)), -2, 2)
    out = []
    for (s, db, hz, hollow_db, hollow_hz, pan_db), (a, b) in zip(rows, luck):
        if pan_db is None:
            pan_db = pan_scatter_db * b
        out.append((s, db, hz * np.exp(snap_scatter * a), hollow_db, hollow_hz, pan_db))
    return out


def pops():
    t = np.arange(1500) / SR
    events = bursts()
    out, white = np.zeros((2, N + len(t))), rng.standard_normal((len(events), 2, len(t)))
    bright = signal.butter(1, 1200, "high", fs=SR, output="sos")
    rip_level = np.exp(-t / 0.00038) + 0.23 * np.exp(-t / 0.0015)
    for (s, snap_db, snap_hz, hollow_db, hollow_hz, pan_db), (mid, side) in zip(events, white):
        mid[0] = -1.3
        rip = spread(mid, side, 0.76) * rip_level
        snap = signal.sosfilt(bright, 1.1 * rip + 2.0 * resonate(rip, snap_hz, 0.4 * snap_hz))
        rising = 2 * np.pi * hollow_hz * t * (1 + 8 * t)
        dying = np.exp(-t * hollow_hz / 0.88) + 0.089 * np.exp(-t * hollow_hz / 6)
        hollow = -np.sin(rising) * dying * (1 - np.exp(-t * hollow_hz * 6))
        pop = magnitude_from_level(snap_db + 8.0) * snap / np.abs(snap).max() + magnitude_from_level(hollow_db + 5.0) * hollow
        at = round(s * SR)
        out[:, at:at + len(t)] += pop * magnitude_from_level(np.array([[.5], [-.5]]) * pan_db)
    return out[:, :N]


def scene():
    echo_db = -21
    slime = pops() + tearing() + holes() + sliding()
    return slime + magnitude_from_level(echo_db) * echoes(slime) + stand() + table() + room_tone() + ticks()


def roll_off(x):
    return signal.sosfilt(signal.butter(12, 16990, fs=SR, output="sos"), x)


def record(dry):
    ceiling, cutoff_hz = .85, 16900
    rounded = ceiling * np.tanh(dry / ceiling)
    low_pass = signal.cheby2(12, 70, cutoff_hz, fs=SR, output="sos")
    mix = signal.sosfilt(low_pass, rounded)
    return roll_off(mix)


dry = scene()
out = record(dry)
master_out(out)
```